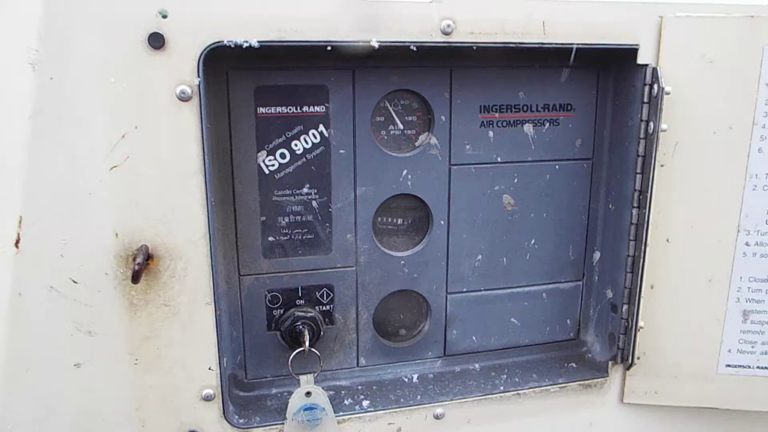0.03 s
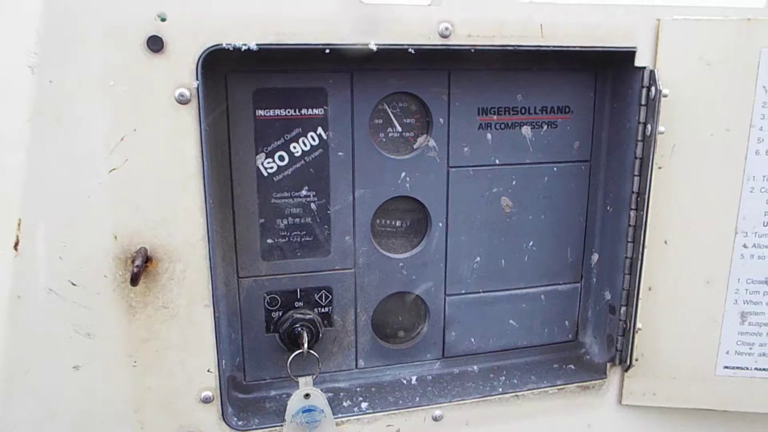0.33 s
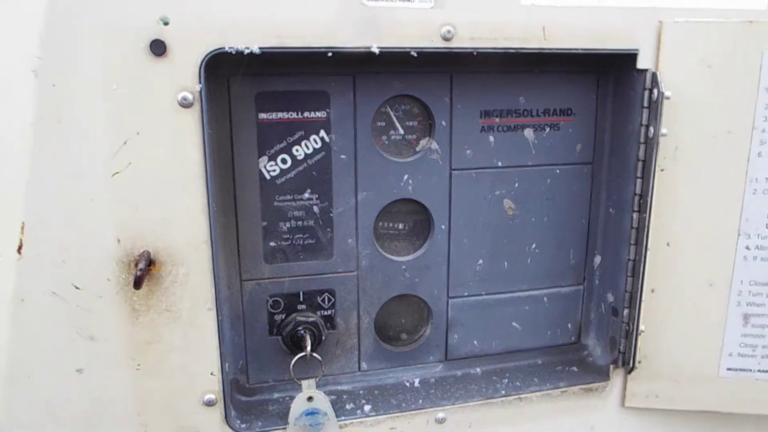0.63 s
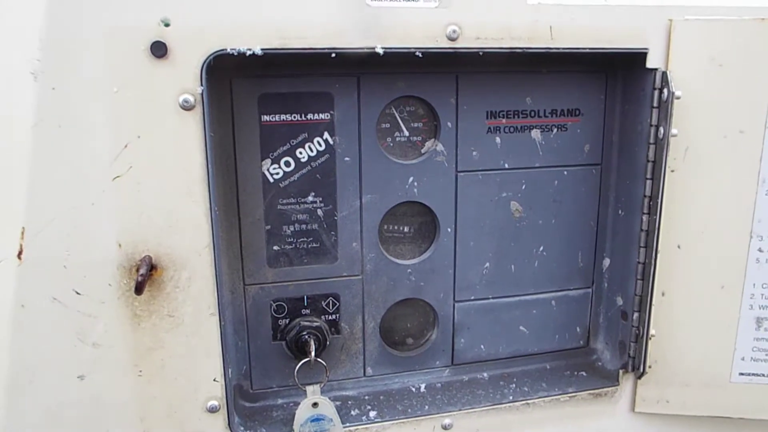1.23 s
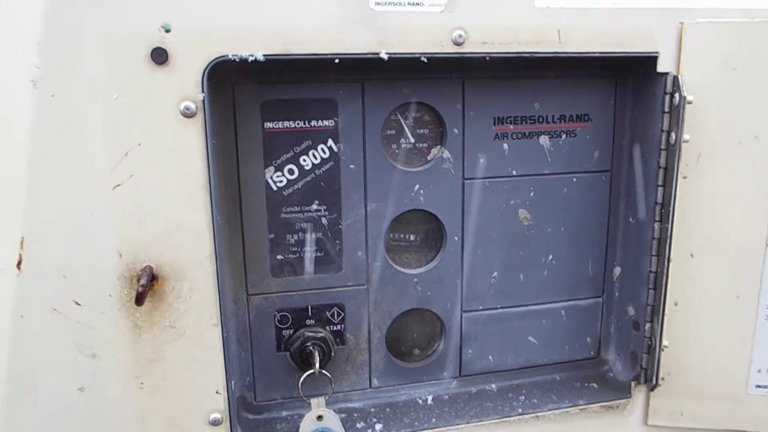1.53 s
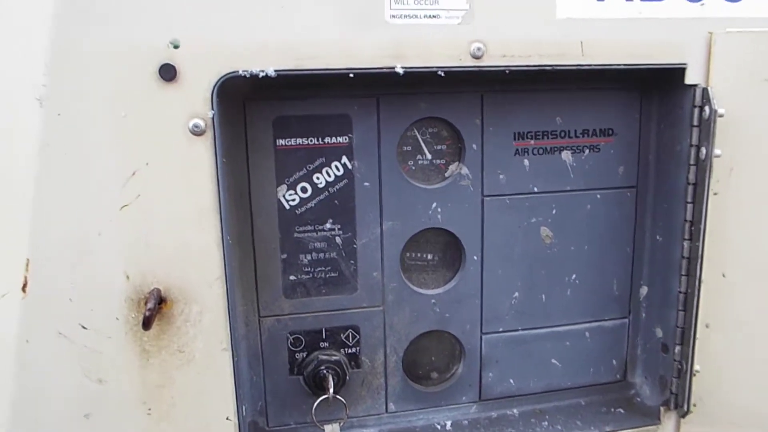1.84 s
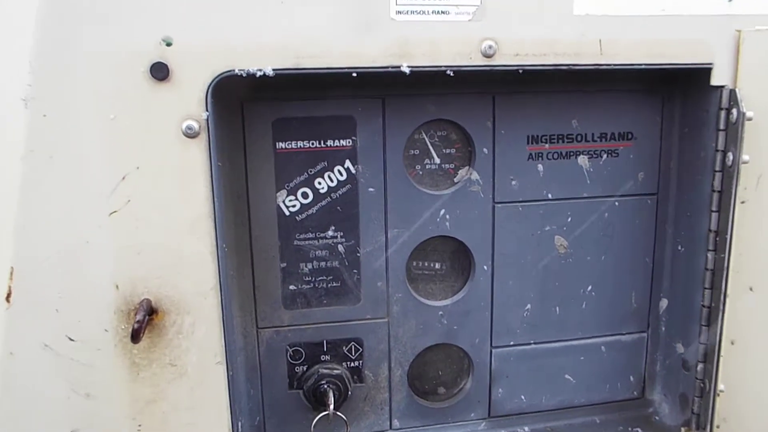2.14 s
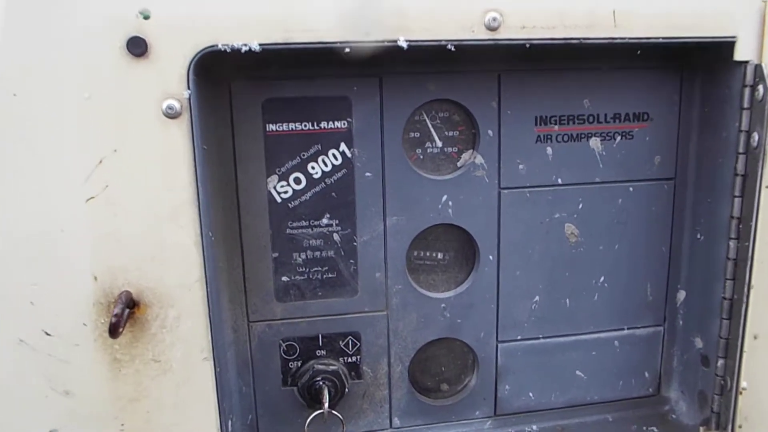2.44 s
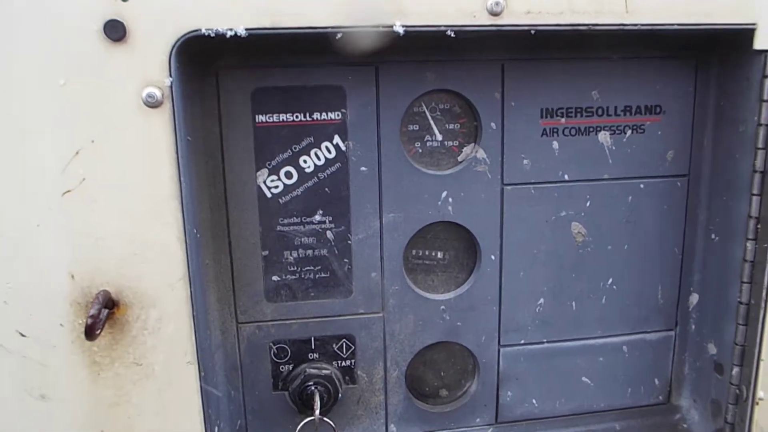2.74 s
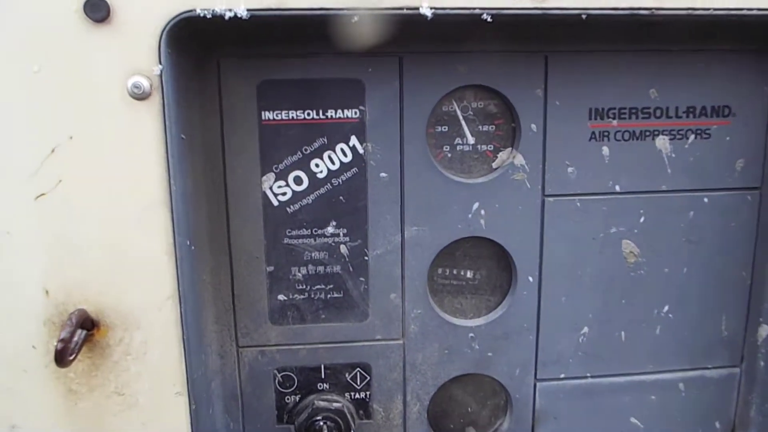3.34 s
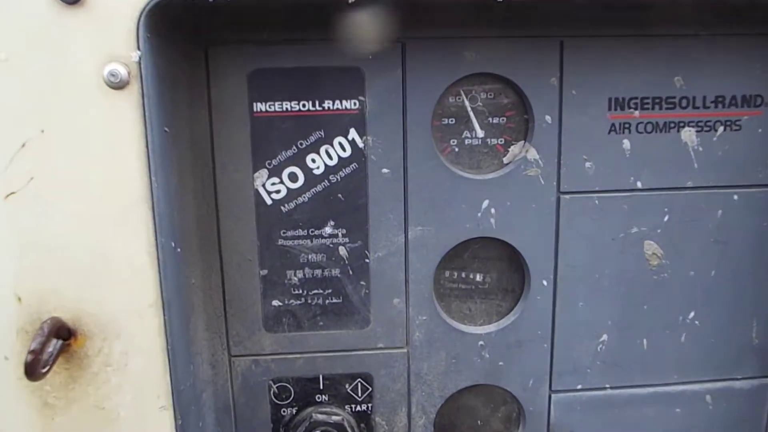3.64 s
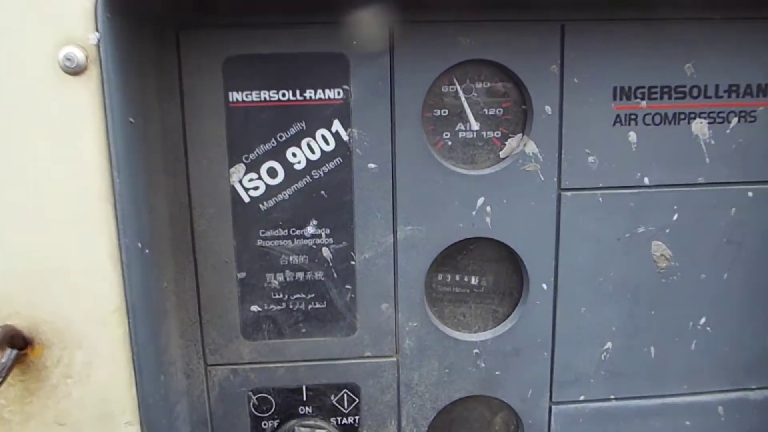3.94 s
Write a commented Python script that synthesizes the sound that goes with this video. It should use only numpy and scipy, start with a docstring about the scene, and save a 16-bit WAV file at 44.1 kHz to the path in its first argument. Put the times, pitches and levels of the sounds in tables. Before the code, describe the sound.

Loud, steady clatter, hiss and hum of a diesel-driven air compressor running outdoors.

```python
"""Outdoors, a handheld stereo microphone stands off from an air compressor on a four-cylinder diesel.
The recorder fades in on loud clatter and hiss ringing in the steel housing, over exhaust drone and fan.
From 1.5 s the microphone closes on the control panel, and two panel echoes and the resonances shift.
From 2 s the engine creeps up in speed, and the scene ends close to the panel.
All along, the recorder limits and clips the peaks, and the level dips briefly now and then."""
import sys
import numpy as np
from scipy import signal
from scipy.io import wavfile
from scipy.ndimage import map_coordinates

SR = 44100
rng = np.random.default_rng(int(sys.argv[2]) if len(sys.argv) > 2 else 0)


def bounce(signal):
    """Save signal as a 16-bit WAV file at the path given by the first command-line argument."""
    frames = np.transpose(np.atleast_2d(signal))
    limited = np.clip(frames, -1, 1)
    pcm = np.round(limited * 32767).astype(np.int16)
    wavfile.write(sys.argv[1], SR, pcm)


N = 176400
TIME = np.arange(N) / SR

# engine speed: t/s, firing rate/Hz
FIRING_RATE = [(0, 67.7), (.5, 67.3), (1, 67.8), (2, 67.5), (3, 70.15), (4, 71.3)]
# clatter and hiss at the microphone: t/s, level/dB
CLATTER_LEVEL = [(0, -6), (1, -7.5), (2, -6.5), (3, -6), (4, -5.5)]
# their broad spectrum: f/Hz, relative level/dB
CLATTER_COLOUR = [(15, -49), (40, -45), (120, -48.5), (220, -43), (330, -45), (430, -46), (600, -45),
                  (1200, -43.5), (1900, -44.5), (2700, -41), (3600, -37), (4700, -36.5), (5500, -38),
                  (7000, -43.5), (7700, -45), (9000, -47), (10200, -54), (11000, -51), (12000, -55.5),
                  (14000, -51), (15600, -66)]
# the walk up to the panel: t/s, nearness (0 far, 1 close)
NEARNESS = [(0, 0.024), (1.5, 0.062), (2, 0.54), (2.5, 0.82), (4, 1)]
# resonances and hollows of the steel housing: f/Hz, width/Hz, lift far off/dB, lift close up/dB
HOUSING_MODES = [(340, 70, 4, -4.5), (860, 64, 6, -2.5), (1020, 106, 6.5, 6.5), (1530, 230, 4.5, 3.5),
                 (2460, 112, 5, 8), (3037, 87, 4, 5), (3207, 49, 8, 9.5), (3500, 17, 9, -1),
                 (3925, 115, 9, -1), (4160, 106, 9, 3), (4650, 110, -9, -0.5), (4570, 80, 5, 6),
                 (4810, 29, 2.5, 6.5), (5024, 41, 6, 4), (5400, 130, -2, 2.5), (5540, 60, -2, -1),
                 (6074, 175, 12, 6), (6785, 180, 9.5, 7), (7400, 120, 7.5, -0.5), (7780, 200, -8, -1)]
# two echoes off the panel: t/s, first delay/ms, its gain, second delay/ms, its gain
PANEL_ECHOES = [(0.0, 0.88, 0.2, 1.3, 0), (1.5, 0.86, 0.09, 1.28, 0.23), (1.9, 0.79, 0.11, 1.134, 0.14),
                (2.25, 0.87, 0.07, 1.05, 0.2), (2.55, 0.6, 0.11, 1.064, 0.12),
                (3.0, 0.64, 0.06, 1.04, 0.07), (3.5, 0.593, 0, 0.86, 0.03), (4.0, 0.4, 0.05, 0.79, 0.18)]
# two resonances and a notch between panel and microphone (a negative depth lifts):
# t/s, lower f/Hz, lift/dB, upper f/Hz, lift/dB, notch f/Hz, depth/dB
RECESS_MODES = [(1.6, 2700, 6.5, 4400, -1.5, 4920, -11.5), (2.2, 2950, 4, 4520, 6.5, 5000, -2.5),
                (2.8, 3000, 4, 4680, 6.5, 5550, 3), (3.4, 3169, 2, 5020, 9, 5800, 4),
                (4, 3500, 1.5, 4900, 4, 6300, 0)]
# treble shelf at the microphone: t/s, level/dB
TREBLE_LEVEL = [(0, 3), (1.4, 3), (1.9, -0.5), (2.8, -1), (3.4, -.5), (4, 0)]
# likeness of left and right: f/Hz, coherence (0-1)
MIC_COHERENCE = [(60, 0.94), (1400, 0.99), (3100, 1), (6800, 0.77), (10000, 0.75), (15000, 0.55)]
# stereo balance: f/Hz, left minus right/dB
MIC_BALANCE = [(60, 3.5), (700, -3), (1290, -1), (2380, -2.5), (3400, -5.5), (4600, -7.5), (6200, -3.5),
               (8200, -1.5), (11000, -2.5), (15000, -8)]
# phase across the pair: f/Hz, left lead/rad
MIC_PHASE = [(60, 0.58), (1900, -0.21), (2500, -0.82), (6800, -0.41), (8400, -1.04), (10200, -1.3),
             (13000, -2.1)]
# exhaust tones: multiple of the firing rate, base level/dB
EXHAUST_ORDERS = [(.5, -40), (1, -16.5), (1.25, -47), (1.75, -37.5), (2, -26), (3, -44), (3.75, -43),
                  (5, -38.5), (6, -54), (8, -39)]
# added to the exhaust tones: t/s, firing tone/dB, other orders/dB
EXHAUST_TRIM = [(0, 0.7, 2.5), (1, -0.3, 2), (2, -.3, -1), (3.4, 0.8, -1.5), (4, 2, -2)]
# belt-driven cooling fan: multiple of the firing rate, base level/dB
FAN_ORDERS = [(1.115, -38), (2.79, -37), (3.9, -29.5)]
# brief dips in level: t/s, depth/dB, recovery/s
LEVEL_DIPS = [(.529, 4.5, 0.011), (.543, 8, 0.015), (0.609, 6, .014), (.676, 6.5, 0.024), (.742, 2, 0.017),
              (0.824, 8, 0.014), (0.897, 5, 0.032), (1.06, 3.5, 0.017), (1.087, 3.5, 0.033),
              (1.595, 4.5, 0.026), (1.682, 5.5, 0.03), (1.984, 3.5, 0.035), (2.1, 3.5, 0.018),
              (2.504, 6.5, 0.027), (2.633, 4.5, 0.015), (2.691, 2.5, 0.018), (2.755, 4.5, 0.02),
              (3.053, 5.5, .028), (3.211, 5, 0.021), (3.523, 4.5, .016), (3.627, 6.5, 0.012),
              (3.741, 7, 0.022), (3.926, 3.5, 0.03)]


def clatter(firings, knock_share=0.13, decay_firings=0.37, scatter_db=4, repeat_share=0.3):
    """Direct and diffuse hiss, knocking at each firing; some grain recurs every four firings."""
    grain = rng.standard_normal(2560)
    cycle_phase = firings / 4 % 1
    repeated = unit_rms(map_coordinates(grain, [cycle_phase * len(grain)], order=3, mode="grid-wrap"))
    strength = amp(scatter_db * rng.standard_normal(1024))[firings.astype(int)]
    knocks = unit_rms(strength * np.exp(-(firings % 1) / decay_firings))
    fresh, diffuse = rng.standard_normal((2, N))
    direct = np.sqrt(repeat_share) * repeated + np.sqrt(1 - repeat_share) * fresh
    flutter = amp(0.32 * wander(TIME, step=0.015))
    envelope = np.sqrt(1 - knock_share + knock_share * knocks ** 2) * flutter
    return envelope * np.array([direct, diffuse])


def housing(noise):
    """The clatter rings in the steel box and is coloured by the panel on its way to the microphone."""
    hz, t, (direct, diffuse) = signal.stft(noise, SR, nperseg=2048, noverlap=1536)
    f, near = hz[:, None], at_time(NEARNESS, t)[0]
    modes_db = sum((far_db + (close_db - far_db) * near) * resonance(f, centre, width)
                   for centre, width, far_db, close_db in HOUSING_MODES)
    colour_db = at_freq(CLATTER_COLOUR, f) + recess(f, t) + modes_db + ripple(hz, t, near)
    pair = panel_echoes(f, t) * amp(colour_db) * microphone_pair(direct, diffuse, f)
    return unit_rms(signal.istft(pair, nperseg=2048, noverlap=1536)[1][:, :N])


def panel_echoes(f, t):
    """Comb-filter gain: two short reflections off the panel interfere with the direct sound."""
    first_ms, first_gain, second_ms, second_gain = at_time(PANEL_ECHOES, t)
    delayed = lambda ms: np.exp(-2j * np.pi * f * ms / 1000)
    return abs(1 + first_gain * delayed(first_ms) + second_gain * delayed(second_ms))


def recess(f, t, width_hz=350, shelf_hz=6340):
    """Colour in dB: resonances glide up as the microphone nears the recessed panel; the treble eases."""
    low, low_db, high, high_db, notch, depth_db = at_time(RECESS_MODES, t)
    modes = [(low, low_db), (high, high_db), (notch, -depth_db)]
    glides = sum(db * resonance(f, centre, width_hz) for centre, db in modes)
    shelf = (1 + np.tanh((f - shelf_hz) / 600)) / 2
    return glides + at_time(TREBLE_LEVEL, t)[0] * shelf


def ripple(hz, t, near, depth_db=3.3, step_hz=25):
    """Fine peaks and valleys in dB that reshuffle as the microphone moves."""
    position = 0.86 * t + 2.48 * near  # hand sway plus the approach
    grid = np.meshgrid(hz / step_hz, position, indexing="ij")
    pattern = unit_rms(map_coordinates(rng.uniform(-1, 1, (2048, 32)), grid, order=3, mode="wrap"))
    bass_taper = hz / np.hypot(hz, 400)
    return depth_db * pattern * bass_taper[:, None]


def microphone_pair(direct, diffuse, f):
    """Left and right spectra, apart in level and phase; the left hears diffuse sound in the treble."""
    coherence = at_freq(MIC_COHERENCE, f)
    tilt = amp(at_freq(MIC_BALANCE, f) / 2)
    lead = np.exp(1j * at_freq(MIC_PHASE, f))
    left = (coherence * direct + np.sqrt(1 - coherence ** 2) * diffuse) * lead
    return np.array([left * tilt, direct / tilt]) / np.hypot(tilt, 1 / tilt)


def exhaust_and_fan(firings):
    """Drone and hum under the clatter, a little to the right: pure tones locked to the engine."""
    firing_db, others_db = at_time(EXHAUST_TRIM, TIME)
    tone = lambda order, db: amp(db) * np.sin(2 * np.pi * (order * firings + rng.random()))
    waver_db = lambda: wander(firings, step=4)  # about 1 dB from one engine cycle to the next
    exhaust = sum(tone(order, db + (firing_db if order == 1 else others_db + waver_db()))
                  for order, db in EXHAUST_ORDERS)
    fan = sum(tone(order, db + waver_db()) for order, db in FAN_ORDERS)
    return (exhaust + fan) * amp([[-1.15], [1.15]])


def amp(db):
    """Decibels to gain."""
    return 10 ** (np.asarray(db) / 20)


def unit_rms(x):
    """Scales to rms 1."""
    return x / np.sqrt(np.mean(x ** 2) + 1e-20)


def at_time(rows, t):
    """Every column of a time table, read at times t."""
    times, *columns = np.transpose(rows)
    return [np.interp(t, times, column) for column in columns]


def at_freq(rows, hz):
    """A spectrum table read on a log-frequency axis."""
    f, value = np.transpose(rows)
    return np.interp(np.log(hz + 1), np.log(f + 1), value)


def wander(x, step):
    """A smooth random curve along x that changes about once a step."""
    return unit_rms(map_coordinates(rng.standard_normal(4096), [x / step], order=3, mode="wrap"))


def resonance(f, centre, width):
    """The shape of one resonance, 1 at its centre."""
    return 1 / (1 + (2 * (f - centre) / width) ** 2)


def scene():
    """The compressor at the microphone: one engine speed drives clatter and drone."""
    firings = np.cumsum(at_time(FIRING_RATE, TIME)[0]) / SR
    drone = exhaust_and_fan(firings)
    clatter_gain = amp(at_time(CLATTER_LEVEL, TIME)[0])
    return clatter_gain * housing(clatter(firings)) + drone


def record(dry, open_s=0.073, fade_s=0.078, limit=1.42, release_s=0.036, knee=6.6, edge_hz=15650):
    """The handheld recorder: fade-in, dips, a limiter lagging each peak, soft clipping, band limit."""
    fade_in = (TIME >= open_s) * amp(-21 * np.clip(1 - (TIME - open_s) / fade_s, 0, 1))
    dips_db = sum(depth * (TIME >= start) * np.exp(-((TIME - start) / recovery) ** 2)
                  for start, depth, recovery in LEVEL_DIPS)
    x = dry * amp(-dips_db) * fade_in
    over_db = 20 * np.log10(np.maximum(abs(x).max(0) / limit, 1))
    release = np.exp(-TIME / release_s)
    held_db = np.maximum.accumulate(over_db / release) * release
    limited = x / amp(signal.lfilter(np.hanning(41) / 20, 1, held_db))  # attack of about 1 ms
    clipped = limited / (1 + abs(limited) ** knee) ** (1 / knee)
    lowpass = signal.firwin(511, edge_hz, window=("kaiser", 9), fs=SR)
    return signal.oaconvolve(clipped, lowpass[None], "same")


dry = scene()
out = record(dry)
bounce(out)
```